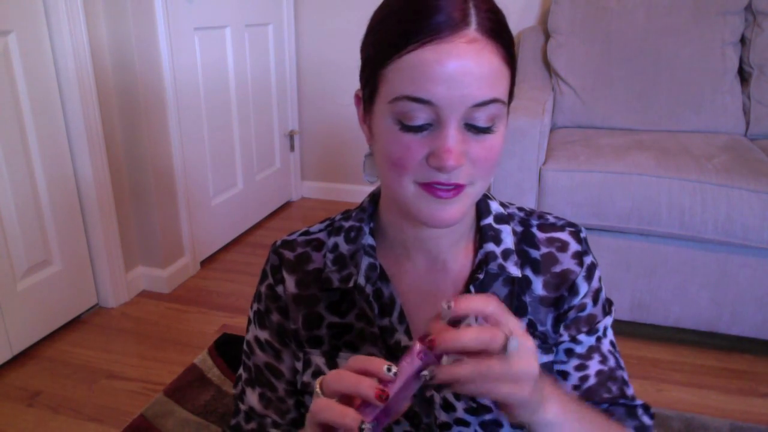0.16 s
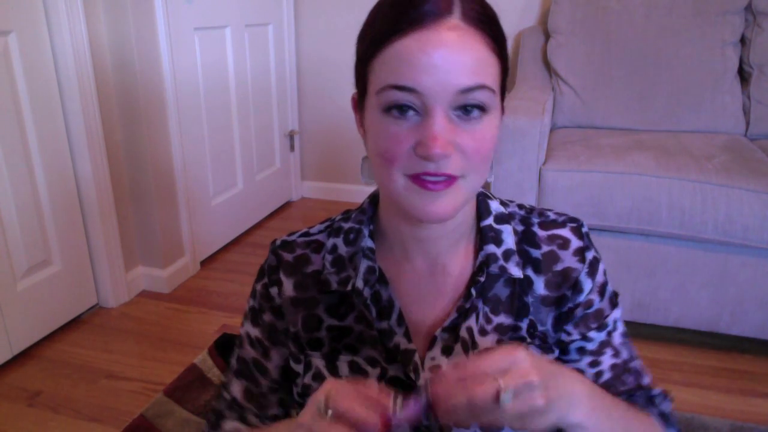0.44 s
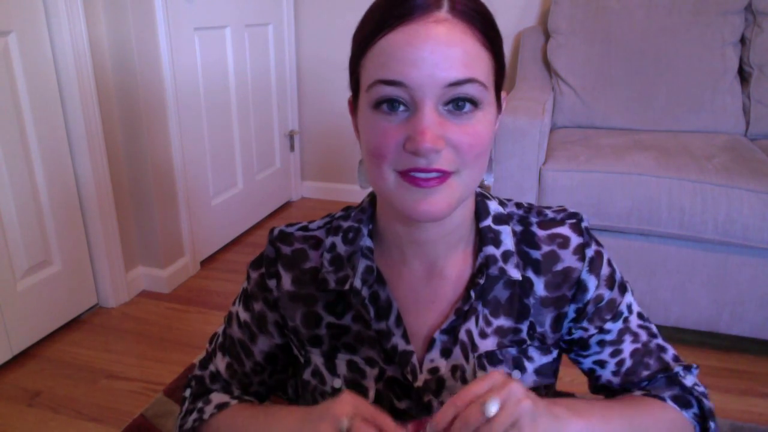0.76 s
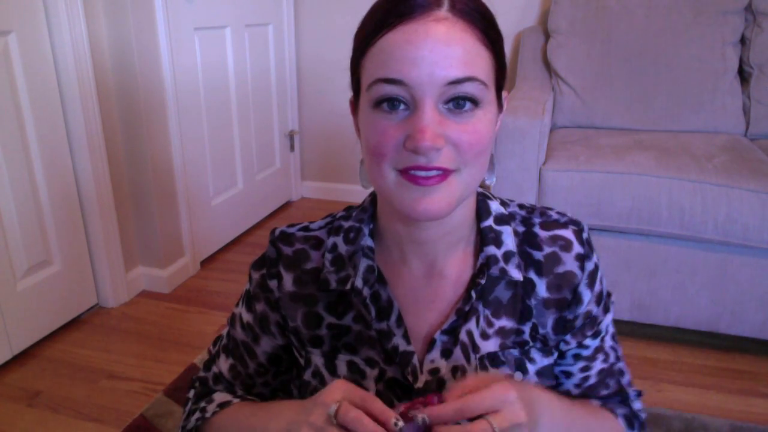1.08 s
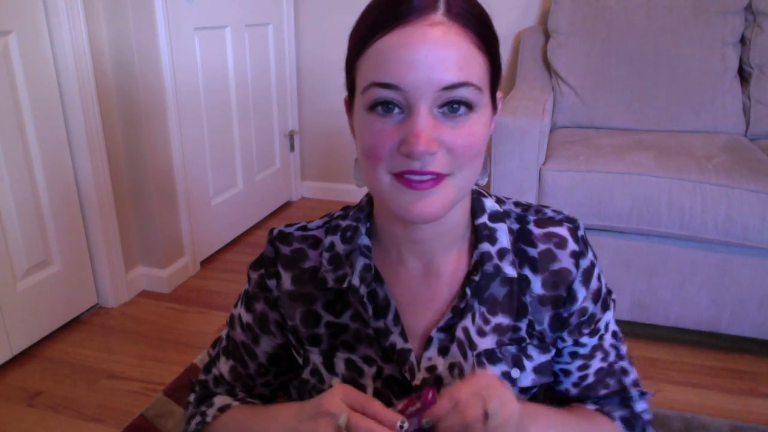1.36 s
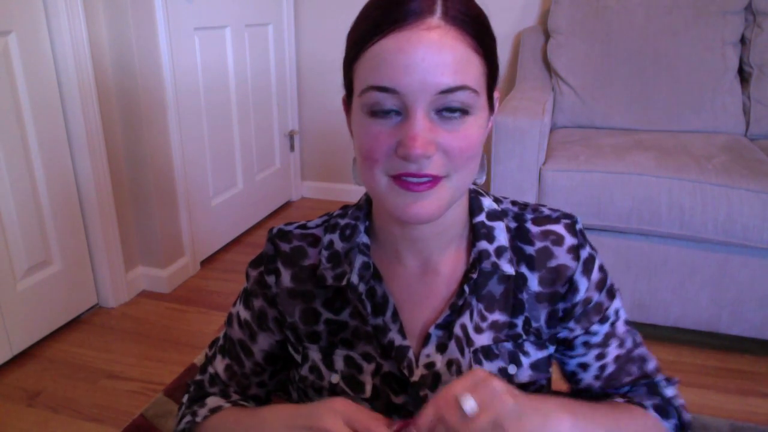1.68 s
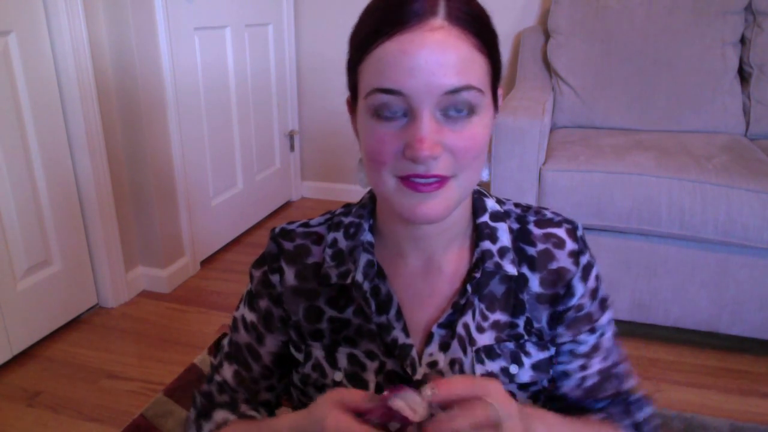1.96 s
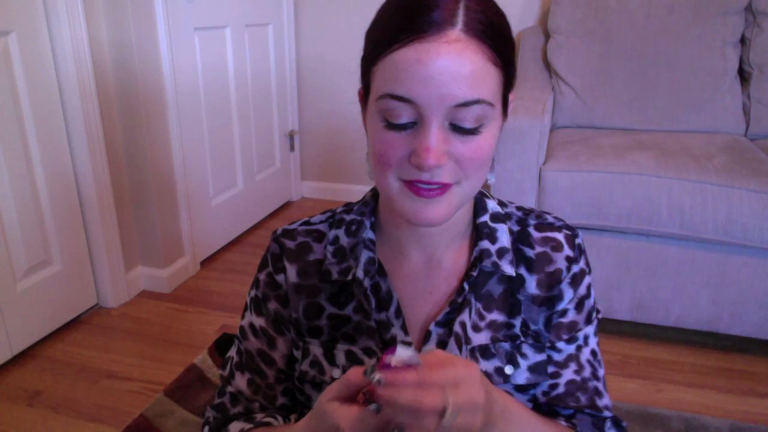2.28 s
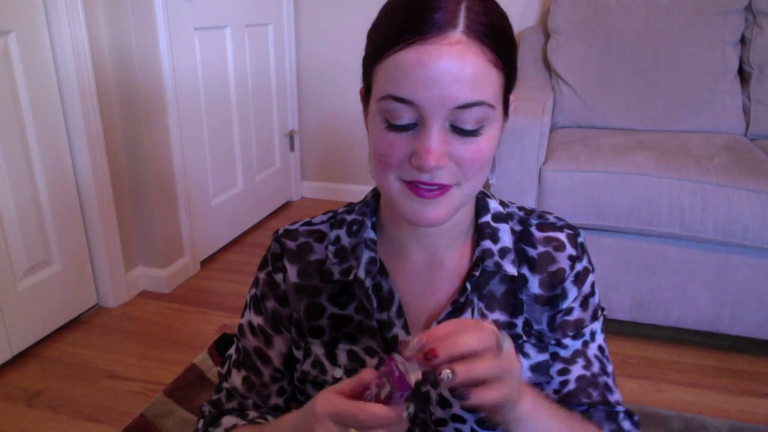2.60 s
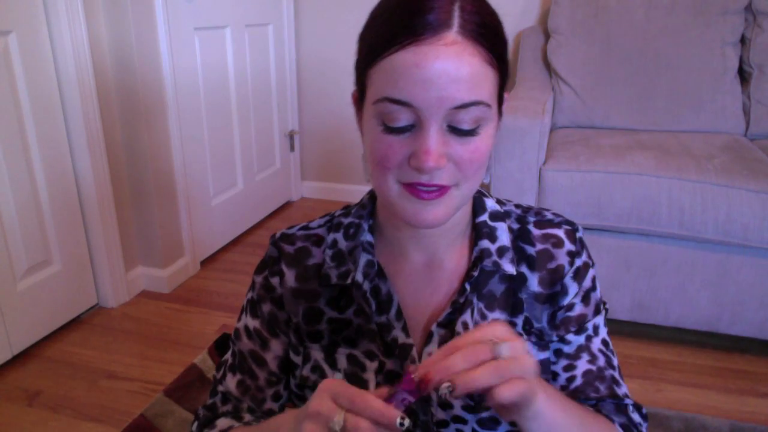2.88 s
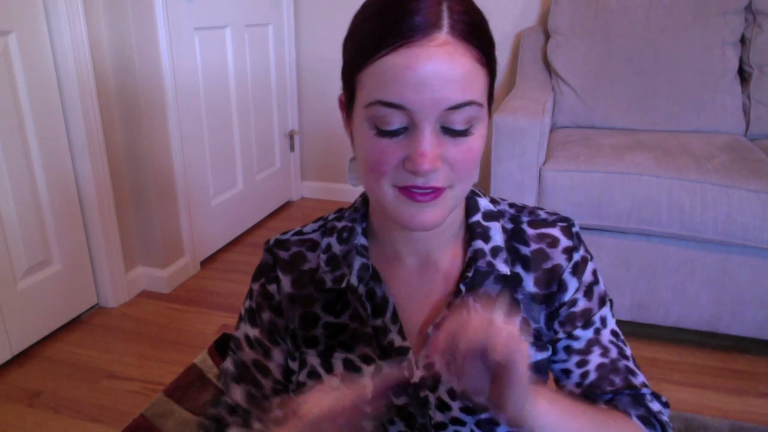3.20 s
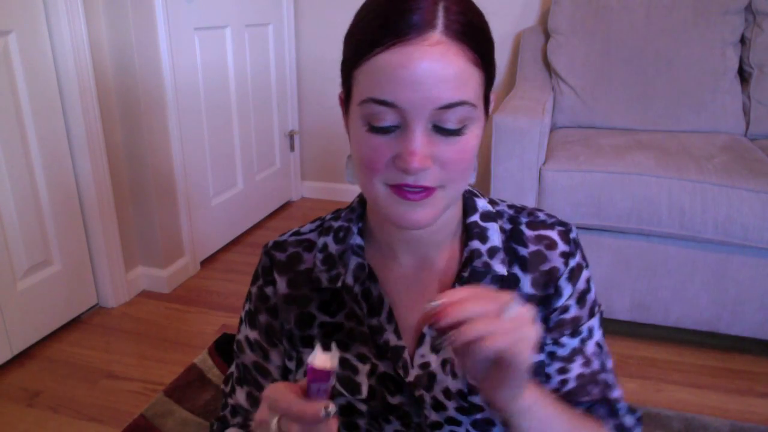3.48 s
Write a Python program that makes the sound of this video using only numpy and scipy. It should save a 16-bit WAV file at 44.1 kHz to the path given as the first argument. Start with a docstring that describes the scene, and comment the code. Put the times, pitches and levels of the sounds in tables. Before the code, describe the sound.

A small plastic tube clicks and crinkles in fingers, then snaps open loudly.

```python
"""A quiet living room, microphone close to the hands: fingers work at a small stiff plastic tube.
Over a soft steady hum of air, the plastic starts to snap in single dry clicks, each with its own ring,
and to crinkle in short runs of tiny slips. The room answers every click. Near the end, at about
three seconds, there are two loud snaps as the tube's cap comes off."""
import sys
import numpy as np
from scipy import signal
from scipy.fft import rfft, irfft, next_fast_len
from scipy.io import wavfile

SR = 44100
rng = np.random.default_rng(int(sys.argv[2]) if len(sys.argv) > 2 else 0)


def digitize_waveform(pressure):
    """Quantize a signal to 16-bit integers and store it at the path in sys.argv[1].

    Rows of a 2-D input are taken as channels; values are limited to [-1, 1].
    """
    field = np.atleast_2d(pressure).T
    bounded = np.clip(field, -1, 1)
    quanta = np.round(bounded * 32767).astype(np.int16)
    wavfile.write(sys.argv[1], SR, quanta)


N = 160965
CLICK_SAMPLES, TAIL_SAMPLES = 1024, 16384


def snaps(rebound_s=.0011, rebound_db=-11):
    """Close up, each snap is one sharp kick into the plastic and a small rebound as it flicks back."""
    # Each row: start in seconds, energy in dB, low and high band edge in Hz, first ring in Hz and dB,
    # second ring in Hz and dB, bright crack in dB, send to the room in dB.
    clicks = [(0.099, -35.5, 395, 6260, 1170, 7, 3160, 3, -6.5, 6),
              (0.113, -30, 400, 4830, 3190, 19, 7300, 16, -19, 3.5),
              (0.1504, -25.5, 530, 4800, 3680, 10, 7260, 2, -21, -7),
              (0.254, -36, 3750, 6200, 1380, 11, 4260, -3, -14, 1),
              (0.33, -32.5, 400, 4240, 1240, 14, 4440, 7, -39, 1),
              (0.539, -24, 830, 6340, 5600, 9, 6660, 6, -12, 0),
              (0.5624, -19.5, 2950, 5400, 4100, -24, 7100, 1, -34, 7),
              (0.762, -25.5, 3520, 4370, 2200, 12, 5220, 2, -30, 5),
              (0.7911, -25, 1240, 5700, 2540, 6, 5100, 28, 3, 6.5),
              (0.819, -27, 1800, 7000, 2230, 26, 5300, -2, 2, 6),
              (0.904, -29, 2500, 6500, 4250, 13, 5600, -6, -15, -7),
              (0.9954, -10, 3160, 4150, 1420, 16.5, 6950, 1, -30, 1),
              (1.003, -14, 1760, 7520, 3220, 10.5, 5300, -2, -10, 5.5),
              (1.091, -24, 1200, 5970, 4330, -2, 7340, 4, -38, 0.5),
              (1.222, -25, 570, 2440, 2190, 9, 4390, 12, -43, 6),
              (1.306, -29.5, 400, 1940, 2130, 1, 4090, 14, -29, 1),
              (1.3982, -14.5, 970, 2930, 1650, 18, 4570, 17, -40, 0.5),
              (1.4049, -14.5, 1490, 2120, 2270, 18.5, 4970, 24.5, -33, 4),
              (1.546, -21.5, 3260, 5140, 1460, 6, 4250, 5, -35, 5.5),
              (1.5527, -13.5, 2380, 8000, 1390, -9, 4300, 3, -39, -11),
              (1.5559, -18.5, 3210, 7350, 4210, 20, 7390, -14, -21, 3.5),
              (1.561, -21, 430, 10700, 4900, 18, 5600, 20, -25, 7.5),
              (1.645, -30, 2470, 4210, 1530, 14, 2840, 4, -28, -5),
              (1.8671, -22, 2840, 7700, 2930, 4, 3880, 8, -15.5, 9),
              (2.057, -31, 2860, 3130, 1450, -7, 3800, 6, -45, 2.5),
              (2.114, -38.5, 2500, 6500, 3830, 5, 5800, 1, -3, 12),
              (2.127, -26, 620, 5960, 2920, 8, 7310, -1, -25, 1),
              (2.133, -29, 2120, 7080, 1080, 8, 5560, 12, -21, 2.5),
              (2.188, -6, 624, 4160, 2150, 11.5, 3290, 7.5, -56, 3.5),
              (2.275, -27, 4000, 10800, 5350, 3, 9600, -2, -25, 3),
              (2.3372, -7.5, 1700, 3400, 1416, 12.5, 4950, 3.5, -58, 4.5),
              (2.3607, -11.5, 1420, 3600, 1600, 13, 3350, -5, -49, -1),
              (2.4762, -24, 500, 6340, 770, 15, 5470, -4, -5.5, 5.5),
              (2.562, -28.5, 1210, 6000, 2050, 6, 3570, -4, -22, -6),
              (2.723, -26.5, 900, 5750, 4000, 5, 5840, 13.5, 4, 1),
              (2.729, -23.5, 1450, 6860, 5100, -16, 6970, -5, -22, 0.5),
              (2.813, -27, 3410, 6800, 1180, 13, 5800, 6, -9.5, 3.5),
              (2.9722, -21.5, 650, 5060, 3500, 8, 6170, 7, 6.5, 1),
              (3.0092, 7.5, 560, 7200, 4215, 16, 5400, 10, -7, -1.5),
              (3.0429, -8, 1730, 5100, 1590, -13, 3640, 1, -31, 0),
              (3.0834, -17, 800, 7100, 1480, -7, 3660, -9, -22, 4.5),
              (3.1665, -7.5, 676, 10860, 2700, 8, 3840, 13, -2, -1.5),
              (3.174, -1.5, 2000, 5300, 2500, 7, 3240, 10, -24, -6.5),
              (3.182, -11, 1580, 7810, 3920, 0, 5300, 12, -2.5, -7),
              (3.2026, -18, 1720, 2820, 5270, -2, 8810, 1, -21, 19),
              (3.2132, 5.5, 686, 4420, 1534, 4, 3920, 10.5, -15, -1.5),
              (3.481, -37, 900, 3490, 1622, 9.5, 2390, 1, -32.5, -3.5)]
    out, kick = np.zeros(N), signal.unit_impulse(CLICK_SAMPLES)
    add(kick, rebound_s, from_db([rebound_db]))
    for (start_s, energy_db, *patch, room_db), room in zip(clicks, room_responses(len(clicks))):
        click = from_db(energy_db) * unit_energy(plastic(kick, *patch))
        add(out, start_s, click)
        add(out, start_s, from_db(room_db) * signal.fftconvolve(click, room))
    return out


def crinkles(slips_per_s=1000, spread_db=3, swell_share=.45):
    """Dense slips of uneven size swell and fade while the fingers push."""
    # Each row: start and length in seconds, rms level in dB, low and high band edge in Hz,
    # first ring in Hz and dB, second ring in Hz and dB, bright crack in dB.
    runs = [(0.101, 0.071, -69, 2500, 4500, 3130, 3, 3640, 9, -7),
            (0.189, 0.2, -74, 1200, 5270, 1700, 6, 3800, -9, -40),
            (0.538, 0.034, -56.5, 4060, 7400, 4700, -10, 7260, 24, -15),
            (0.752, 0.089, -55, 2220, 4830, 2220, 15, 3600, 12, -21),
            (0.803, 0.094, -55, 2180, 8700, 2400, 13, 5000, -7, -14),
            (0.892, 0.11, -65, 3000, 5030, 4240, 5, 4400, -5, -19),
            (0.993, 0.035, -40, 2430, 6500, 3700, 6, 4860, -7, -18),
            (1.076, 0.018, -48, 1990, 6740, 2300, -4, 4760, -5, -33),
            (1.193, 0.06, -62, 4470, 7350, 6700, 9, 7000, -9, -25),
            (1.282, 0.28, -67.5, 1400, 4700, 2100, -5, 4300, -13, -46),
            (1.554, .022, -42, 4020, 8150, 4400, 9, 5900, 5, -19),
            (1.681, .15, -68.5, 1780, 4300, 3450, -7, 3900, -11, -48),
            (2.496, 0.036, -54, 2490, 6900, 3300, -9, 5430, 11, -20),
            (2.508, 0.019, -47, 2400, 6800, 5450, 1, 6100, -1, -13),
            (2.53, 0.026, -57.5, 2460, 6900, 5300, -4, 7100, 7, -25),
            (2.714, 0.023, -47.5, 2120, 6500, 4000, -3, 5900, 2, -16),
            (2.88, .052, -53.5, 3970, 6500, 5300, 0, 5870, 4, -15),
            (2.97, 0.041, -53, 3200, 6200, 3800, 10, 5800, 18, -8),
            (3.165, 0.083, -37, 1470, 7660, 3700, -4, 5300, -7, -12)]
    out = np.zeros(N)
    for (start_s, length_s, rms_db, *patch), room in zip(runs, room_responses(len(runs))):
        n = int(length_s * SR)
        chance, size, sign = rng.random((3, TAIL_SAMPLES))[:, :n]
        strength = from_db(-spread_db * np.log(np.maximum(size, .02)))
        slips = (chance < slips_per_s / SR) * strength * np.sign(sign - .5)
        force = np.pad(slips * signal.windows.tukey(n, swell_share), (0, CLICK_SAMPLES))
        run = from_db(rms_db) * np.sqrt(n) * unit_energy(plastic(force, *patch))
        add(out, start_s, run)
        add(out, start_s, signal.fftconvolve(run, room))
    return out


def plastic(force, low_hz, high_hz, first_hz, first_db, second_hz, second_db, crack_db, ring_q=10.5):
    """A patch of plastic radiates one broad band, two short rings and a bright crack on top."""
    # The crack glints in narrow modes. Each row: pitch in Hz, gain in dB.
    modes = [(9400, 5), (10700, 8), (11900, 5.5), (14400, 4)]
    force = disperse(cut(force + 1e-18, 280, "high"))  # so small a thing radiates little bass
    body = cut(cut(force, low_hz, "high"), high_hz, "low", order=4)
    rings = from_db(first_db) * ring(body, first_hz, ring_q)
    rings += from_db(second_db) * ring(body, second_hz, ring_q)
    crack = cut(cut(force, 9480, "high", order=3), 15460, "low")
    detune = 1 + .065 * rng.uniform(-1.2, 1, len(modes))  # a little different on every patch
    glints = sum(from_db(db) * ring(crack, hz * shift, q=24) for (hz, db), shift in zip(modes, detune))
    return body + rings + from_db(crack_db) * (from_db(-17) * crack + glints)


def disperse(x):
    """Bending waves linger in the plastic: allpass filters spread each kick over a millisecond or two."""
    # The bands that leave late. Each row: centre in Hz, width in Hz.
    lingering = [(600, 590), (1600, 1900), (3600, 910), (5500, 2500), (11000, 2530)]
    for hz, width_hz in lingering:
        radius = np.exp(-np.pi * width_hz / SR)
        feedback = [1, -2 * radius * np.cos(2 * np.pi * hz / SR), radius * radius]
        x = signal.lfilter(feedback[::-1], feedback, x)
    return x


def room_responses(count):
    """The living room from each place of the hands: early reflections, then a short diffuse tail."""
    # Early reflections. Each row: delay in seconds, gain in dB, pitch in Hz above which it is dulled.
    reflections = [(.0059, -12.5, 6000), (0.0154, -18, 7000)]
    # The tail's decay. Each row: frequency in Hz, seconds to fall by 60 dB.
    t60 = [(300, 0.11), (1000, 0.28), (2500, 0.25), (5000, 0.23), (9000, 0.19), (15000, 0.18)]
    # The tail's colour. Each row: frequency in Hz, gain in dB.
    colour = [(300, -0.5), (800, -5.5), (1600, -5), (3200, -2.5), (5000, -1), (8000, -1), (11000, -1.5),
              (15000, -8)]
    t, hz = np.arange(TAIL_SAMPLES) / SR, np.fft.rfftfreq(TAIL_SAMPLES, 1 / SR)
    spectra = rfft(rng.standard_normal((count, TAIL_SAMPLES))) * from_db(at_hz(colour, hz))
    tail_db, tail_delay_s, build_s = -.3, .00067, .0078
    build = 1 - np.exp(-np.maximum(t - tail_delay_s, 0) / build_s)
    edges_hz, tails = np.geomspace(150, 20000, 10), 0
    for low, high in zip(edges_hz, edges_hz[1:]):
        decay = unit_energy(build * from_db(-60 * t / at_hz(t60, np.sqrt(low * high))))
        band = irfft(spectra * ((hz >= low) & (hz < high)))
        tails += from_db(tail_db) * decay * band
    early, impulse = np.zeros(TAIL_SAMPLES), signal.unit_impulse(CLICK_SAMPLES)
    for delay_s, db, dull_hz in reflections:
        add(early, delay_s, from_db(db) * cut(impulse, dull_hz, "low", order=1))
    return tails + early


def room_tone(rms_db=-60):
    """Behind the hands, steady soft air noise with a low hum and a broad resonance near 800 Hz."""
    # The spectrum of the air. Each row: frequency in Hz, relative density in dB.
    air = [(30, -34.5), (50, -25), (70, -19.5), (105, 2.5), (140, -2.5), (250, -3.5), (340, -10),
           (560, -11), (650, -7), (770, 1.5), (930, -2.5), (1150, -13), (1450, -12), (1720, -9),
           (2050, -13), (3000, -21.5), (4400, -22), (6500, -25.5), (9000, -30.5), (15000, -39)]
    size = next_fast_len(N)
    colour = from_db(at_hz(air, np.fft.rfftfreq(size, 1 / SR)))
    noise = irfft(rfft(rng.standard_normal(size)) * colour, size)[:N]
    return from_db(rms_db) * np.sqrt(N) * unit_energy(noise)


def from_db(db):
    """Decibels to gain."""
    return 10 ** (np.asarray(db) / 20)


def unit_energy(x):
    """Scale so that the squares sum to 1."""
    return x / np.sqrt(np.sum(x ** 2) + 1e-20)


def at_hz(points, hz):
    """Read a table on a log-frequency axis."""
    points_hz, values = np.transpose(points)
    return np.interp(np.log(np.maximum(hz, 1)), np.log(points_hz), values)


def cut(x, hz, kind, order=2):
    """Butterworth high-pass or low-pass filter."""
    return signal.sosfilt(signal.butter(order, hz, kind, fs=SR, output="sos"), x)


def ring(x, hz, q):
    """One resonance, gain 1 at its peak."""
    return signal.lfilter(*signal.iirpeak(hz, q, fs=SR), x)


def add(out, start_s, x):
    """Mix x into out from start_s on."""
    i = int(round(start_s * SR))
    part = x[:max(len(out) - i, 0)]
    out[i:i + len(part)] += part


def scene():
    """The plastic tube in the living room, on one close microphone."""
    return (snaps() + crinkles() + room_tone())[None]


def record(dry):
    """The recorder cuts the top steeply above 15.7 kHz."""
    return signal.sosfilt(signal.ellip(10, .1, 80, 15700, fs=SR, output="sos"), dry)


dry = scene()
out = record(dry)
digitize_waveform(out)
```